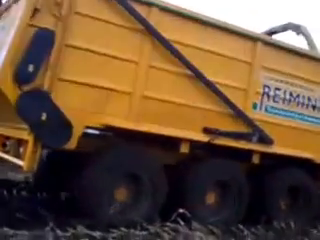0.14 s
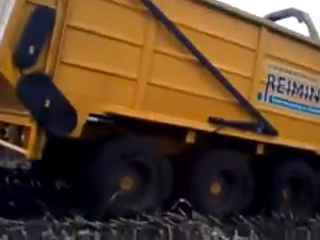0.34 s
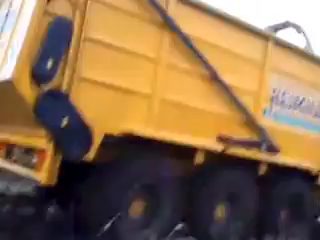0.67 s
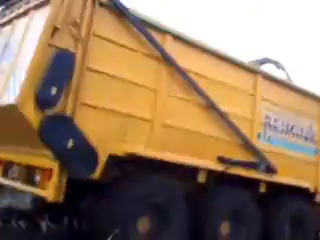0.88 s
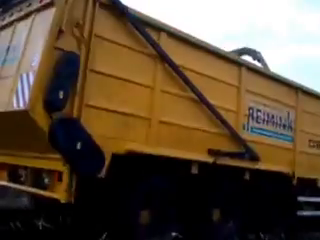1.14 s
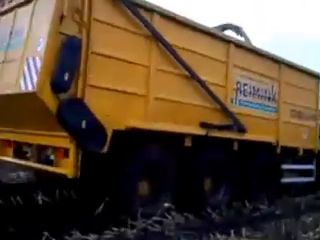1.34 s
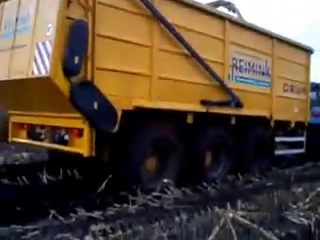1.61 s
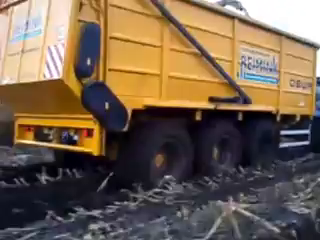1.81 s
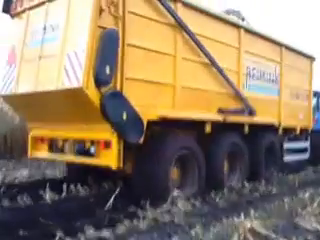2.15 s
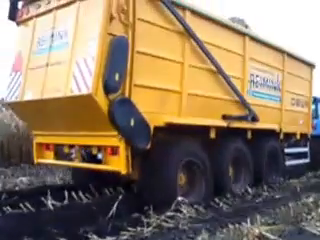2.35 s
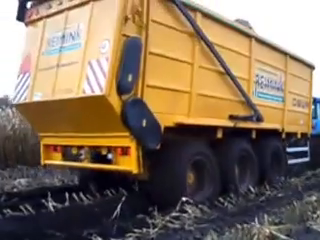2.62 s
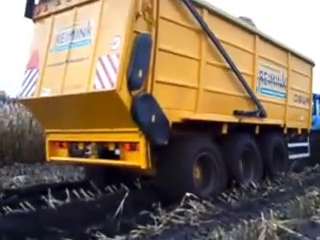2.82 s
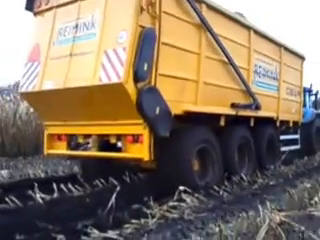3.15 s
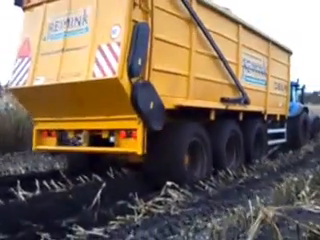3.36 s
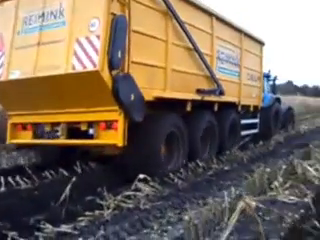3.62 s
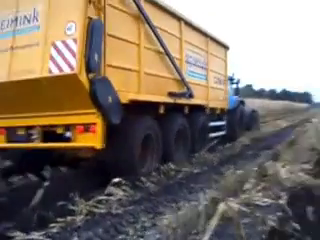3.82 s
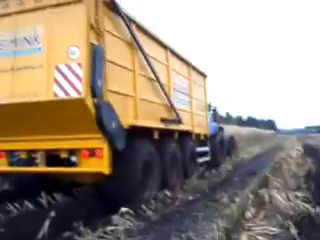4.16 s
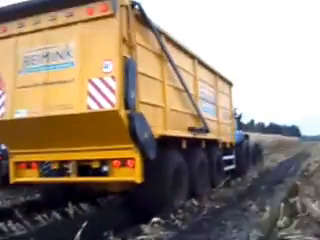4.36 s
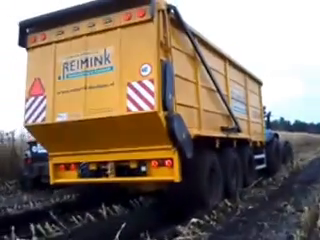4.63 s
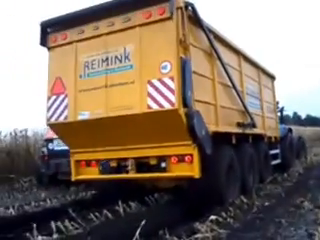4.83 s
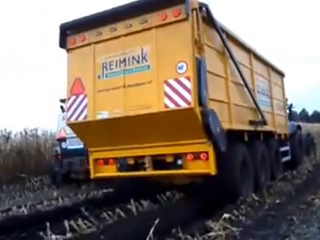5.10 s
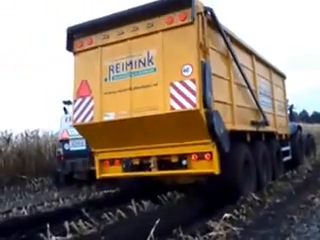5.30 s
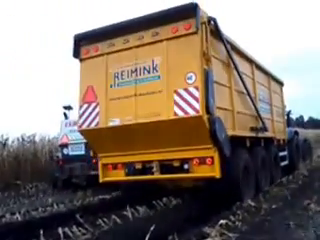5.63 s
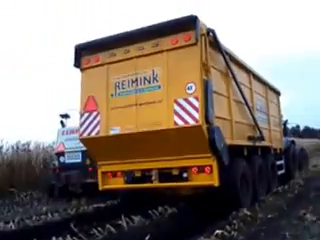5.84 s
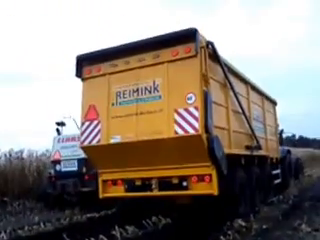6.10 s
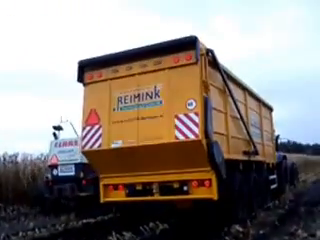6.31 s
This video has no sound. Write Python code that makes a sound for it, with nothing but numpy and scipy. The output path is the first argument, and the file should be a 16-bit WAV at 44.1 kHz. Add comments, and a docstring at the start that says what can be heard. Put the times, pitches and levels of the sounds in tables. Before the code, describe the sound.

A forage harvester and a tractor run throughout, about six and a half seconds, in an open field. Their diesel engines drone with a light clatter, a fan roar and the rough hum of chopping knives, the pitch creeping upward. Thin, wavering whines and squeals come and go over the first three seconds. Wind bumps the microphone at the start, gusts from about 0.8 to 1.4 seconds, and hits hardest between 3.6 and 4.3 seconds with short thuds and some crackle. The knife hum swells from 2 to 3 seconds, dips, and returns around 4.7. From about 4.3 seconds the harvester is clearer and louder, with ringing sheet metal and a bright, surging hiss of chopped crop through the spout. High squeals return near 5 seconds and from 6 seconds, joined by a lower whine. The small microphone sounds thin and narrow, with little bass.

```python
"""Two diesels drone under the hum of a knife drum, heard from the track at the edge of an open field.
A forage harvester is chopping maize, and a tractor hauls a high trailer beside it on the near side.
Chopped crop hisses through the spout, louder as the trailer stops screening it; whines come and go.
Gusts buffet the small microphone, which passes little bass and overloads on the peaks."""
import sys
import numpy as np
from scipy import signal
from scipy.fft import rfft, irfft, next_fast_len
from scipy.io import wavfile

SR = 44100
rng = np.random.default_rng(int(sys.argv[2]) if len(sys.argv) > 2 else 0)


def log_audio(samples):
    """Write samples as a 16-bit WAV file to the path given in sys.argv[1]."""
    # one column per channel
    frames = np.atleast_2d(samples).T
    # limit to full scale, then quantise
    limited = np.clip(frames, -1, 1)
    pcm = np.round(limited * 32767).astype(np.int16)
    wavfile.write(sys.argv[1], SR, pcm)


N = 285327
TIME = np.arange(N) / SR
KNIVES_PER_TURN = 7.08   # cuts per turn of the harvester's crank


def from_db(db):
    """Decibels to gain."""
    return 10 ** (np.asarray(db) / 20)


def rms_one(x):
    """Scale to unit power."""
    return x / np.sqrt(np.mean(x ** 2) + 1e-20)


def in_time(rows):
    """A curve of (time, value) points, sample by sample."""
    times, values = np.transpose(rows)
    return np.interp(TIME, times, values)


def drift(rate_hz):
    """Smooth random wander with a spread of about 1."""
    step, settle = 40, 2000   # samples per step, steps of run-in
    pole = np.exp(-2 * np.pi * rate_hz * step / SR)
    kicks = rng.standard_normal(N // step + settle + 2)
    slow = signal.lfilter([1], [1, -2 * pole, pole * pole], kicks)[settle:]
    return np.interp(np.arange(N) / step, np.arange(len(slow)), rms_one(slow))


def noise(colour):
    """Noise of unit power with the given spectral shape."""
    hz, db = np.transpose(colour)
    size = next_fast_len(N)
    bins = np.maximum(np.fft.rfftfreq(size, 1 / SR), 1)
    gain = from_db(np.interp(np.log(bins), np.log(hz), db, left=-np.inf, right=-np.inf))
    return rms_one(irfft(rfft(rng.standard_normal(size)) * gain, size)[:N])


def ringing_metal(force, modes, swell_db, swell_hz):
    """Resonances shaken by noise under a common force, each swelling and ebbing by itself."""
    out = 0
    for hz, width, db in modes:
        r = np.exp(-np.pi * width / SR)
        poles = [1, -2 * r * np.cos(2 * np.pi * hz / SR), r * r]
        shake = force * from_db(db + swell_db * drift(swell_hz)) * rng.standard_normal(N)
        out = out + signal.lfilter([(1 - r * r) / 2, 0, (r * r - 1) / 2], poles, shake)
    return rms_one(out)


def tone(turns, rough):
    """A sine of unit power that wavers in phase and flutters in level."""
    phase = 2 * np.pi * (turns + rng.random()) + rough * drift(4.0)
    flutter = rough * drift(14) / 2
    return rms_one(np.sin(phase) * (1 + flutter))


def throb(turns, depth):
    """One swell on every turn."""
    return rms_one(np.exp(depth * np.cos(2 * np.pi * turns)))


def in_view(screened_db, open_db):
    """Level in dB of a harvester sound as the trailer clears the line to the microphone."""
    # line of sight: t/s, view (0 hidden, 1 clear)
    view = [(0, 0.033), (1.1, 0.095), (2.2, 0.25), (3.3, 0.13), (4.2, 0.33), (5.0, 0.69), (5.5, 0.76),
            (6.0, 0.95), (6.47, 0.87)]
    return screened_db + (open_db - screened_db) * in_time(view)


def echoed(x):
    """Short echoes comb the sound into fine ridges."""
    # bounces off the trailer wall and the ground: delay/s, gain
    echoes = [(.0037, 0.032), (.0089, 0.064), (0.0164, 0.12)]
    return x + sum(gain * np.interp(TIME - delay, TIME, x, left=0) for delay, gain in echoes)


def breeze(rise_s=0.026, fall_s=0.066, calm_db=-31):
    """Wind strength: each gust rises, holds and dies back to a light air."""
    # gusts at the microphone: start/s, end/s, level/dB
    gusts = [(0.79, 1.068, -17), (1.22, 1.38, -16.5), (3.58, 3.669, -18.5), (3.784, 3.892, -13.5),
             (3.902, 4.06, -12), (4.149, 4.335, -18.5)]
    strength = 0
    for start, end, db in gusts:
        rise = np.clip((TIME - start) / rise_s, 0, 1)
        fall = np.exp(-np.maximum(TIME - end, 0) / fall_s)
        strength += from_db(db) * rise * fall
    return np.hypot(from_db(calm_db), strength)


def eddies(strength, per_s=14, rise_s=0.0034, thud_db=4, crackle_db=-10):
    """Lesser buffets at random moments, their levels relative to the wind that carries them."""
    at = np.flatnonzero(rng.random(N) < per_s / SR)
    wind_db = 20 * np.log10(strength[at])
    return [(t, rise_s, db + thud_db, db + crackle_db) for t, db in zip(TIME[at], wind_db)]


def wind(thud_trim_db, crackle_trim_db, lumpy_db, gust_db):
    """Lumpy turbulence at the microphone port, with single eddies that hit as short thuds."""
    # turbulence at the port: f/Hz, relative level/dB
    wind_colour = [(20, -24), (90, 0), (190, 2), (310, 8.5), (480, 4), (700, -3), (1100, -26),
                   (1700, -36.5), (2600, -33.5), (5000, -30)]
    # finer turbulence of a hard gust: f/Hz, relative level/dB
    gust_colour = [(400, -11.5), (700, 5), (1100, 4.5), (1500, -2), (2200, -8), (3500, -16)]
    # one eddy hitting the port: f/Hz, relative level/dB
    thud_colour = [(120, -12), (300, 6.5), (460, 8.5), (720, -0.5), (1100, -12), (1700, -29.5)]
    # the hardest buffets, before the trims: t/s, rise/s, thud/dB, crackle/dB
    buffets = [(.050, 0.0036, 7, -31), (.091, 0.0039, 4.5, -28), (.130, 0.0023, 1, -17),
               (.587, 0.004, 0.5, -11), (.762, 0.0042, 5.5, -21), (0.787, 0.0057, 0, -24),
               (.819, 0.00091, 4.5, -12), (1.248, 0.0063, 0, -26), (1.363, 0.0013, 7, 0),
               (1.3686, .0016, 8, -6), (1.725, 0.0035, -2.5, -32), (2.53, 0.0034, -5, -23),
               (2.935, 0.0041, -2, -21), (3.596, 0.0076, 5, -12), (3.624, 0.0031, 2.5, -16),
               (3.651, .0025, 2.5, -21), (3.779, .003, 8.5, -21), (3.789, .004, 8, -6.5),
               (3.853, 0.0035, 4, -8), (3.869, 0.0053, 3, -4), (3.896, 0.0032, 6, -5),
               (3.926, 0.0023, 3, -4), (3.944, 0.0012, 1, -4), (3.957, 0.0015, 8, 4),
               (3.967, 0.0052, 4, -5), (4.006, 0.0049, 4, -8), (4.023, 0.0034, 13, -6),
               (4.044, 0.0031, 4, -8), (4.06, 0.0053, 0, -19), (4.079, .008, -2, -16),
               (4.257, 0.0037, 2.5, -14)]
    strength = breeze()
    pressure = strength * rms_one(from_db(lumpy_db * drift(60)))
    out = pressure * noise(wind_colour)
    # fine eddies grow faster than coarse ones, so a hard gust is brighter
    out += from_db(gust_db) * pressure ** 1.4 * noise(gust_colour)
    coarse, fine = noise(thud_colour), noise(gust_colour)
    for t, rise_s, thud_db, crackle_db in buffets + eddies(strength):
        age = (TIME - t) / rise_s + 1   # in rise times; the push peaks at 1
        near = (age > 0) & (age < 10)
        push = age[near] ** 2 * np.exp(-2 * age[near])
        out[near] += from_db(thud_db + thud_trim_db) * rms_one(push * coarse[near])
        out[near] += from_db(crackle_db + crackle_trim_db) * rms_one(push * fine[near])
    return out


def machinery_whines(wander_hz, catch_db):
    """Whines and squeals come and go in the machinery, unsteady in pitch, catching and letting go."""
    # whines and squeals: start/s, end/s, f/Hz, jitter/Hz, level/dB
    whines = [(0, 0.83, 752, 21, -26.5), (-.02, 0.1, 3130, 45, -25), (-.1, 1.2, 3000, 30, -30.5),
              (.35, 1.85, 3190, 70, -34.5), (.45, 1.2, 1700, 120, -32), (1.5, 1.8, 1797, 42, -34),
              (1.552, 2.3, 2905, 29, -32), (2.098, 2.7, 1358, 22.4, -30.5), (2.25, 3.2, 3020, 30, -32.5),
              (4.678, 5.08, 4400, 60, -25.5), (4.898, 5.2, 4000, 130, -27), (5.88, 6.34, 3740, 25, -28.5),
              (6.12, 6.5, 4140, 27, -23.5), (6.16, 7.02, 698, 9.5, -21.5)]
    out = np.zeros(N)
    for start, end, hz, jitter_hz, db in whines:
        swell = np.sqrt(np.maximum(4 * (TIME - start) * (end - TIME), 0)) / (end - start)
        turns = np.cumsum(hz + wander_hz * drift(7.92) + jitter_hz * drift(89.8)) / SR
        out += from_db(db + catch_db * drift(22)) * swell * tone(turns, rough=0.45)
    return out


def tractor(crank, clatter_db=-23.5, fade_db_per_s=0.23):
    """Six cylinders fire three times a turn: a low note, and a clatter in the block pulsing with it."""
    # engine block resonances: f/Hz, width/Hz, relative level/dB
    block_modes = [(792, 92, 0), (1685, 210, -4), (2994, 410, -0.5), (3410, 360, -4.5), (4790, 160, -4.5)]
    firings = 3 * crank
    drone = from_db(-35.0) * tone(firings, rough=0.15)
    clatter = ringing_metal(throb(firings, depth=0.16), block_modes, swell_db=1.5, swell_hz=3.5)
    return drone + from_db(clatter_db - fade_db_per_s * TIME) * clatter   # the tractor draws away


def harvester(crank):
    """Exhaust tones, fan roar and ringing sheet metal, clearer once the trailer is out of the way."""
    # exhaust tones: approximate multiple of the crank rate, screened/dB, open/dB
    exhaust_tones = [(3, -32, -29), (5, -38.5, -43), (9.5, -36, -37.5), (13, -36.5, -29), (15, -51, -39),
                     (15.5, -42.5, -33.5), (16, -47, -31.5), (17, -45, -34), (19.5, -35.5, -29),
                     (22.5, -42.5, -39), (25.5, -39.5, -33.5), (39.75, -39, -33.5)]
    # fan roar: f/Hz, relative level/dB
    roar_colour = [(25, -17), (60, -6), (160, -3.5), (300, -3.5), (470, 2.5), (570, -3), (660, 4.5),
                   (770, -5), (880, 0.5), (1030, -5), (1350, -3), (1750, -6.5), (2600, -9.5), (4000, -27.5)]
    # sheet metal of the body and spout: f/Hz, width/Hz, relative level/dB
    casing_modes = [(625, 76, -6), (1360, 140, -7), (1904, 67, 7), (2290, 120, -3.5), (3380, 170, -1),
                    (3690, 140, 4), (4036, 130, 4), (4430, 120, 3.5), (5010, 150, 3.5), (5390, 140, 7.5),
                    (5993, 150, 4)]
    # a four-stroke engine repeats every two turns, so its tones lie on half orders
    exhaust = sum(from_db(in_view(screened, clear)) * tone(round(2 * order) / 2 * crank, rough=0.11)
                  for order, screened, clear in exhaust_tones)
    roar_db = in_view(screened_db=-21, open_db=-16.5) + 0.67 * drift(8.5)
    roar = from_db(roar_db) * noise(roar_colour) * throb(crank, depth=0.077)
    cuts = throb(KNIVES_PER_TURN * crank, depth=0.085)
    casing = ringing_metal(cuts, casing_modes, swell_db=3.0, swell_hz=6)
    return exhaust + roar + from_db(in_view(screened_db=-31, open_db=-16)) * casing


def knife_drum(crank):
    """Knives pass the shear bar; the uneven feed roughens their hum."""
    # rise and fall of the hum: t/s, level/dB
    hum = [(0, -31.5), (1.4, -32.5), (2.0, -27), (3.1, -29), (3.6, -33.5), (4.3, -35), (4.72, -23.5),
           (5.5, -24), (6.47, -24.5)]
    # harmonics, relative to the hum: multiple of the knife rate, screened/dB, open/dB
    harmonics = [(1, 5.5, -14), (2, -1.5, -4.5), (3, -6.5, -17.5), (4, -1.5, -2), (6, -11.5, -18)]
    hum_db = in_time(hum)
    cuts = KNIVES_PER_TURN * crank
    return sum(from_db(hum_db + in_view(screened, clear)) * tone(k * cuts, rough=0.37)
               for k, screened, clear in harmonics)


def crop_stream():
    """Countless chips scour the spout in small clumps and thick wads; a few hard grains ring it."""
    # hiss of the chips: f/Hz, relative level/dB
    hiss_colour = [(1800, -25), (2600, -14), (3400, -6), (4300, -4.5), (4900, -2.5), (5500, -1),
                   (6000, 5.5), (6300, 3.5), (6620, 3.5), (6850, -1), (7050, -3), (7300, -13),
                   (7600, -50.5), (8000, -49)]
    # thick wads rushing through: middle/s, length/s, extra hiss/dB
    wads = [(1.42, .25, 1.5), (4.407, 0.17, 3), (5.275, 0.085, 3.5), (5.95, 0.33, 3)]
    # hard grains striking the spout: t/s, peak/dB, f/Hz, t60/s
    grains = [(4.4206, 3, 6130, 0.0052), (4.429, 4, 6680, 0.01), (4.5021, 6, 6100, 0.0037),
              (4.929, -7, 6200, .004)]
    wads_db = sum(db * np.exp(-(2 * (TIME - t) / length) ** 2) for t, length, db in wads)
    clumps_db = 0.5 * drift(31)
    out = from_db(in_view(screened_db=-20.5, open_db=-11) + wads_db + clumps_db) * noise(hiss_colour)
    for t, db, hz, t60 in grains:
        near = (TIME > t) & (TIME < t + t60)
        age = TIME[near] - t
        out[near] += from_db(db - 60 * age / t60) * np.sin(2 * np.pi * hz * age)
    return out


def scene():
    """Both machines out in the field and the wind at the microphone, from the edge of the track."""
    # the harvester's engine picks up speed: t/s, speed/rpm
    revs = [(0, 1730), (0.9, 1808), (1.5, 1822), (2.1, 1891), (2.7, 1886), (3.2, 1893), (4.4, 1912),
            (5.0, 1953), (5.55, 1964), (5.8, 1936), (6.47, 1977)]
    crank = np.cumsum(in_time(revs)) / (60 * SR)   # turns so far
    tractor_crank = 0.905 * crank   # keeping pace at lower revs
    chopping = echoed(harvester(crank) + crop_stream()) + knife_drum(crank)
    machines = chopping + tractor(tractor_crank) + machinery_whines(wander_hz=3.63, catch_db=1.0)
    buffeting = wind(thud_trim_db=-18.5, crackle_trim_db=-14.5, lumpy_db=1.8, gust_db=-3.5)
    return (machines + buffeting)[None]


def low_cut(x, notch_hz, knee_hz, knee_q, corner_hz):
    """Third-order bass filter of the microphone, with a notch just under its knee."""
    notch, knee, corner = 2 * np.pi * np.array([notch_hz, knee_hz, corner_hz])
    poles = np.polymul([1, corner], [1, knee / knee_q, knee ** 2])
    b, a = signal.bilinear([1, 0, notch ** 2, 0], poles, SR)
    return signal.lfilter(b, a, x)


def record(dry):
    """A small, narrow-band mono microphone whose loudest peaks clip and crackle."""
    stopband_hz, crackle_top_hz = 8200, 16000
    thin = low_cut(dry, notch_hz=239.6, knee_hz=308.6, knee_q=1.515, corner_hz=598)
    narrow = signal.sosfilt(signal.cheby2(16, 60, stopband_hz, fs=SR, output="sos"), thin)
    clipped = np.clip(narrow, -1, 1)
    return signal.sosfilt(signal.butter(16, crackle_top_hz, fs=SR, output="sos"), clipped)


dry = scene()
out = record(dry)
log_audio(out)
```